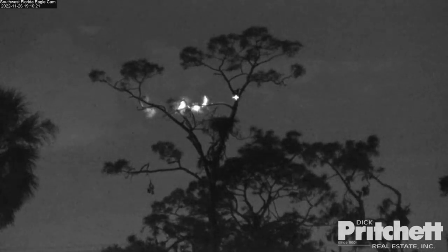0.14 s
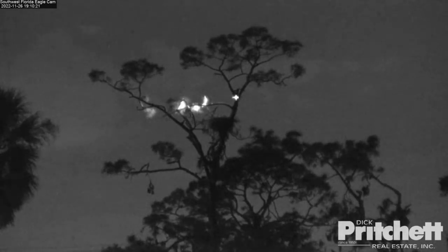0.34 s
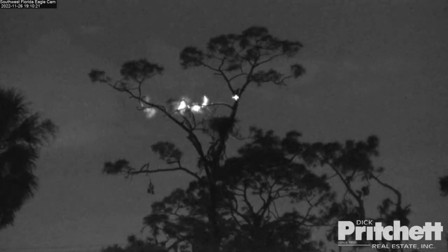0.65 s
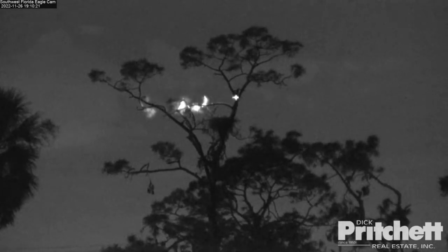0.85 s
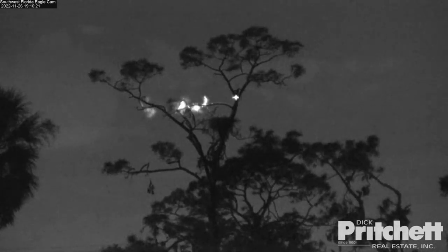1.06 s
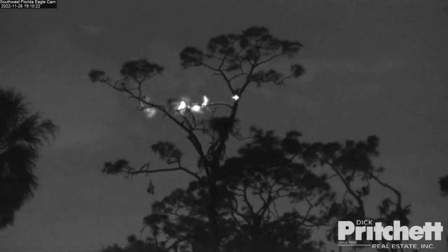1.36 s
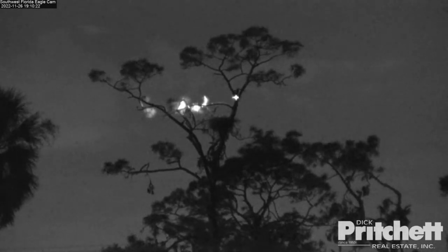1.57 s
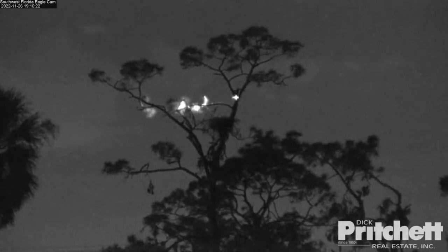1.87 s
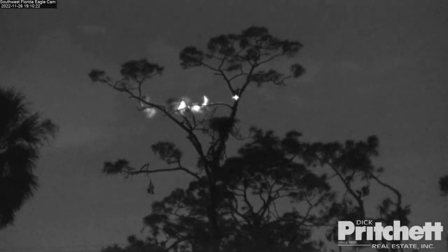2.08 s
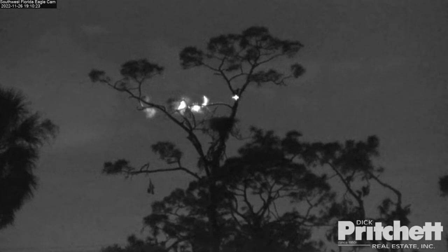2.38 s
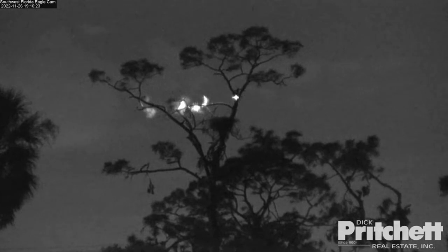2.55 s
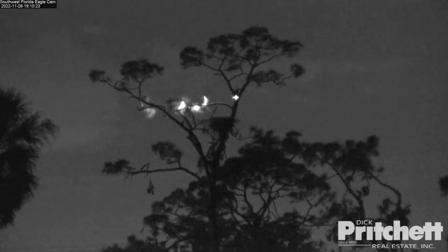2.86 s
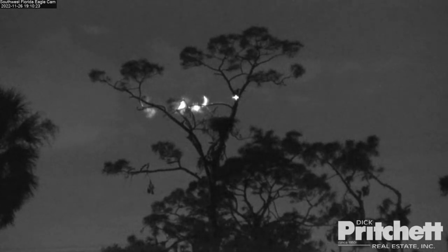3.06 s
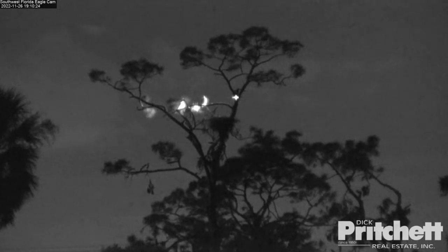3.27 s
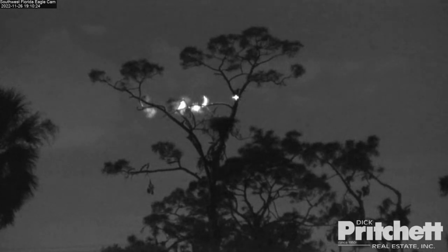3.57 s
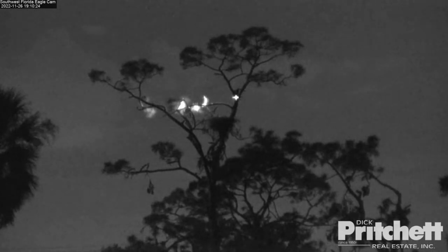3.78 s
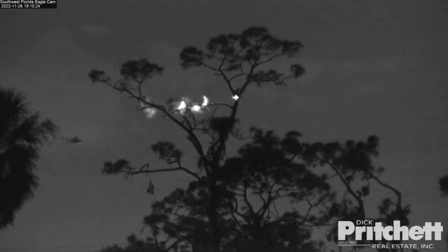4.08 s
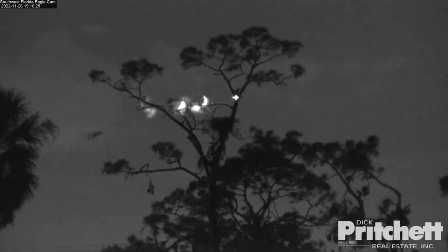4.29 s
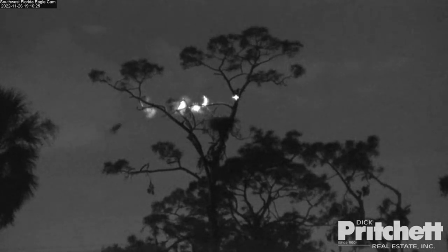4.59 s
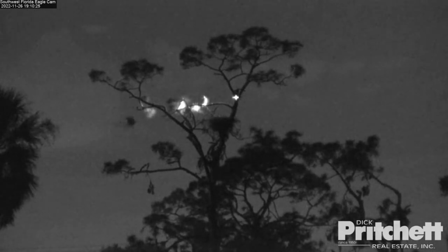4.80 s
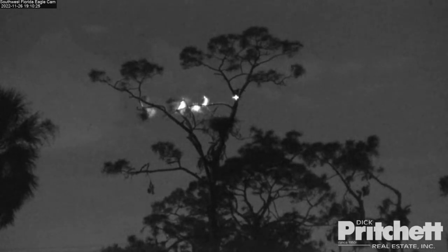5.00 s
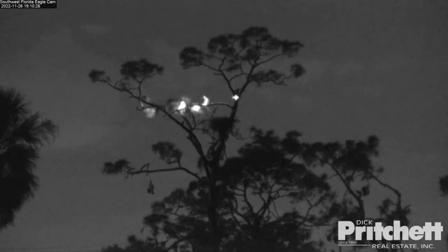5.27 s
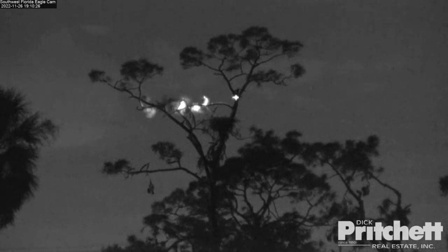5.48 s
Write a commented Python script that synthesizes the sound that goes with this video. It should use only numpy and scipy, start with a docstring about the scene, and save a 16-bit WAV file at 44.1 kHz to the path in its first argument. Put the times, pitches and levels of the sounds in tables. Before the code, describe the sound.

An eagle gives thin, rising squeals and whistles over a low rumble of distant traffic at night.

```python
"""Among pine trees at night, far traffic rumbles under a faint machine hum, insects and a thin hiss.
An eagle calls: air pushed through its voice box (the syrinx) makes thin, rising squeals. Some break
down to a rough low note, others jump up into a whistle. A smaller bird chips faintly in between.
Trunks, ground and foliage throw short echoes back."""
import sys
import numpy as np
from scipy import signal
from scipy.fft import rfft, irfft
from scipy.io import wavfile

SR = 44100
rng = np.random.default_rng(int(sys.argv[2]) if len(sys.argv) > 2 else 0)


def digitize_waveform(pressure):
    """Quantize a signal to 16-bit integers and store it at the path in sys.argv[1].

    Rows of a 2-D input are taken as channels; values are limited to [-1, 1].
    """
    field = np.atleast_2d(pressure).T
    bounded = np.clip(field, -1, 1)
    quanta = np.round(bounded * 32767).astype(np.int16)
    wavfile.write(sys.argv[1], SR, quanta)


N = 248724

# tone colour of the road rumble, the tyre wash and the hiss: f/Hz, relative level/dB
ROAD_RUMBLE = [(4, -9.5), (14, -5), (30, 4.5), (55, -0.5), (70, 6), (90, -3), (115, -8.5), (135, -19),
               (175, -27.5), (240, -35), (400, -85.5)]
TYRE_WASH = [(200, -19.5), (290, -7.5), (350, 1.5), (440, -2.5), (475, -8.5), (660, -9.5), (730, -2),
             (1100, 3.5), (1350, 0.5), (1750, -2), (2100, -15.5), (2700, -22.5), (3300, -33), (5500, -45)]
HISS = [(3000, -20), (5200, -0.5), (6500, -4.5), (7700, 4.5), (8700, -3.5), (9600, -9.5)]
# noisy bands of the machine hum: f/Hz, width/Hz, level/dB
MACHINE_BANDS = [(63, 16, -49), (334.5, 19, -69.5), (714.4, 22, -70), (1505.5, 21, -67), (1698, 160, -63.5)]
# thin tones of the machine hum: f/Hz, level/dB
MACHINE_TONES = [(417, -75), (521, -79)]
# ringing bands of far insects: f/Hz, width/Hz, level/dB
INSECT_BANDS = [(2235, 29, -76.5), (2393, 34, -83), (2666, 62, -83), (2887, 55, -85.5), (3187, 40, -90),
                (3560, 390, -91.5), (4103, 78, -94), (4590, 190, -95), (4810, 70, -97), (5370, 80, -99)]
# the eagle's squeals: t/s, length/s, opening f/Hz, crest f/Hz, sag on the way/Hz, brief slump/Hz,
# final fall/s (0 for none), rough note within that fall/s, relative level/dB, swell in the middle/dB,
# overtones/dB, rasp/0-1, tail/dB, lead-in/s, attack/s, crack/share of the pitch
EAGLE_SQUEALS = [(0.874, 0.082, 1793, 2015, -26, 0, 0.00072, 0.001, -8, 3, 4.5, 0.4, -20.5, 0.027, 0.011, 0.015),
                 (2.036, 0.097, 1864, 2124, -3, -7, 0, 0, -6, 3, 0.5, 0.3, -13, 0.0075, 0.0027, 0.067),
                 (2.504, 0.27, 1927, 2084, 21.5, -2, 0.044, 0.013, -4, -0.5, 1, 0, -26, 0.0096, 0.0088, 0.016),
                 (3.141, 0.33, 1950, 2036, 54.5, 7.5, 0.039, 0.015, -3, -1, 5, 0, -12.5, 0.0046, 0.0017, 0.12),
                 (3.963, 0.22, 1848, 2110, -1.5, -5, 0.044, 0.0056, -5, 0.5, 6, 0, -17, 0.011, 0.0068, 0.016),
                 (4.58, 0.435, 1945, 2083, 78, 45, 0.041, 0.006, -2.5, -1.5, 3.5, 0.03, -15.5, 0.0055, 0.0023, 0.037),
                 (5.458, 0.05, 1893, 2004, -6, 0, 0.00054, 0, -3, -2.5, -1, 0.35, -14, 0.023, 0.0062, 0.0089)]
# its whistles: t/s, length/s, opening f/Hz, closing f/Hz, arch on the way/Hz, relative level/dB,
# overtones/dB, swell towards the end/dB, flutter/0-1, lead-in/s, crack/share of the pitch
EAGLE_WHISTLES = [(0.956, 0.024, 2300, 2370, 3, -13.5, -10.5, -3.5, 0.06, 0.0026, 0.0084),
                  (1.478, 0.12, 2467, 2295, 24, -2.5, -3, 9, 0.78, 0.07, 0.019),
                  (2.126, 0.035, 2344, 2325, 11, 0.5, -4.5, 7, 0, 0.0054, 0.015),
                  (5.512, 0.13, 2380, 2396, 1.5, 4.5, -0.5, 1, 0.03, 0.0043, 0.011)]
# how strongly the eagle's throat passes each frequency: f/Hz, level/dB
EAGLE_THROAT = [(1700, -30), (1820, -35.5), (1900, -36.5), (2030, -38), (2130, -40.5), (2270, -41),
                (2345, -43), (2395, -43.5), (2520, -39.5), (3450, -70), (3650, -65), (3780, -68),
                (3940, -65.5), (4160, -56.5), (4260, -59), (4550, -66.5), (4780, -67), (4950, -70),
                (5300, -82), (5520, -82), (5700, -80), (5970, -75), (6200, -78.5), (6350, -82),
                (7100, -101), (8000, -97), (9600, -101)]
# single echoes off trunks and ground: delay/s, level/dB
TREE_ECHOES = [(.019, -18.5), (.036, -34), (.1, -33.5)]
# the smaller bird's chips: t/s, length/s, f/Hz, level/dB, throat resonance f/Hz, its width/Hz
BIRD_CHIPS = [(3.583, 0.047, 1051, -64, 5240, 120), (3.714, 0.035, 1034, -64.5, 5200, 120),
              (3.833, 0.04, 803, -63, 3810, 250), (4.605, 0.025, 3440, -60, 3400, 3200),
              (4.669, 0.037, 1118, -64.5, 5600, 1490), (4.7, 0.016, 1167, -67, 4630, 400),
              (4.813, 0.032, 1145, -58.5, 5650, 400), (4.805, 0.057, 1183, -73, 4730, 399)]

RELEASE_S = 0.0046  # how quickly the eagle shuts off a note


def gain_of(db):
    """Turns decibels into a factor to multiply by."""
    return 10 ** (np.asarray(db) / 20)


def evened(x):
    """Scales a signal to an average strength (rms) of 1."""
    return x / np.sqrt(np.mean(x ** 2) + 1e-20)


def add(mix, start, sound):
    """Mixes a sound in, start seconds from the beginning."""
    part = mix[round(start * SR):][:len(sound)]
    part += sound[:len(part)]


def fade(t, rise, fall):
    """Soft start and end of a sound."""
    edge = np.clip(np.minimum((t - t[0]) / rise, (t[-1] - t) / fall), 0, 1)
    return np.sin(np.pi / 2 * edge) ** 2


def noise(points):
    """Steady noise, coloured by (f/Hz, level/dB) points."""
    hz, db = np.transpose(points)
    shape_db = np.interp(np.log(np.fft.rfftfreq(N, 1 / SR) + 1), np.log(hz + 1), db)
    return evened(irfft(rfft(rng.standard_normal(N)) * gain_of(shape_db), N))


def band(hz, width_hz):
    """Noise that rings around one pitch; at 0 Hz, a random wobble."""
    offset = (np.fft.rfftfreq(N, 1 / SR) - hz) / width_hz
    return evened(irfft(rfft(rng.standard_normal(N)) / (1 + 2 * offset ** 2), N))


def tremble(t, rate_hz):
    """Smooth random trembling, no faster than about rate_hz."""
    shape = np.exp(-(np.fft.rfftfreq(SR, 1 / SR) / rate_hz) ** 2)
    return evened(irfft(rfft(rng.standard_normal(SR)) * shape, SR))[:len(t)]


def bump(t, width_s):
    """A smooth hill that reaches 1 at t = 0."""
    return np.exp(-(t / width_s) ** 2)


def step(t, blur_s=0.0014):
    """A sudden change from 0 to 1 at t = 0."""
    return .5 + .5 * np.tanh(t / blur_s)


def traffic():
    """A far road: low rumble and a slowly swelling wash of tyres."""
    swell = gain_of(np.linspace(-0.75, 1.5, N))
    return gain_of(-41.5) * noise(ROAD_RUMBLE) + gain_of(-57.5) * noise(TYRE_WASH) * swell


def machine_hum(waver_hz=0.8):
    """A machine drones in bands of noise and thin tones that waver a little."""
    hum = sum(gain_of(db) * band(hz, width_hz) for hz, width_hz, db in MACHINE_BANDS)
    for hz, db in MACHINE_TONES:
        phase = 2 * np.pi * np.cumsum(hz + waver_hz * band(0, 7.3)) / SR
        hum += np.sqrt(2) * gain_of(db) * np.sin(phase)
    return hum


def insects():
    """Far insects blend into a faint, steady ringing."""
    return sum(gain_of(db) * band(hz, width_hz) for hz, width_hz, db in INSECT_BANDS)


def throat(hz):
    """How much of a tone at hz gets through the eagle's throat."""
    return gain_of(np.interp(hz, *np.transpose(sorted(EAGLE_THROAT))))


def breath(age, length, lead, attack, tail, tail_db):
    """The push of air behind a note: a faint lead-in, the full voice, then a weak tail."""
    voiced = np.clip(np.minimum(age / attack, (length - age) / RELEASE_S + .5), 0, 1)
    before = gain_of(-11.5) * np.clip(1 + age / lead, 0, 1) ** .5
    after = gain_of(tail_db) * np.clip(1 - (age - length) / tail, 0, 1) ** .5
    return np.maximum(voiced, np.where(age < length / 2, before, after))


def eagle_voice(age, hz, push, overtones_db, crack, *, jitter, shaky, settle_s, shimmer_db, flicker_db,
                rasp=0, fork=0, end_shake=0, catch_s=0, fork_hz=4140):
    """The syrinx sings a nearly pure tone, shaky at first; returns the base tone and its overtones."""
    unsteady = np.exp(-np.maximum(age, 0) / settle_s) + end_shake * np.exp((age - age[-1]) / 0.12)
    shake = 1 + (jitter + shaky * unsteady) * tremble(age, 79)
    phase = 2 * np.pi * np.cumsum(hz * shake) / SR
    # rasp and an unsteady voice rattle the wave, the overtones most of all
    hoarse = (0.8 * unsteady + rasp) * tremble(age, 150)
    # the pitch shakes in the lead-in and cracks near the start
    cracking = crack * bump(age - catch_s, 0.0028) + 0.012 * (age < 0)
    crack_phase = 2 * np.pi * np.cumsum(hz * cracking * tremble(age, 400)) / SR
    base = throat(hz) * np.sin(phase + 0.18 * rasp * hoarse + crack_phase)
    overtones = sum(throat(k * hz) * np.sin(k * phase + hoarse) for k in range(2, 5))
    # when the voice forks, one side of the syrinx holds a high tone
    fork_phase = 2 * np.pi * np.cumsum(fork_hz * shake) / SR
    high_tone = fork * throat(fork_hz) * np.sin(fork_phase + .25 * hoarse)
    # the tone drops out for an instant near its start, heard as a tiny catch
    dropout = np.tanh((age - catch_s) / 0.0015)
    shimmer = gain_of(shimmer_db * (0.12 + unsteady) * np.tanh(tremble(age, 71)))
    strength = np.sqrt(2) * push * dropout * shimmer * fade(age, 0.0023, 0.0014)
    # the overtones drift slowly, and flicker while the voice is unsteady
    drift_db = overtones_db - tremble(age, 6.7)
    brightness = gain_of(drift_db + flicker_db * unsteady * np.tanh(tremble(age, 99)))
    return strength * base, strength * (overtones * brightness + high_tone)


def squeal(start, length, open_hz, crest_hz, sag_hz, slump_hz, fall, broken_s, db, swell_db,
           overtones_db, rasp, tail_db, lead, attack, crack, broken_hz=1935, slack_hz=1775):
    """The eagle's pitch scoops up, quavers and climbs to a crest, where the voice may break downward."""
    tail = 0.038 if fall > 0 else RELEASE_S
    age = np.arange(-lead, length + tail, 1 / SR)
    voiced = np.maximum(age, 0)
    climb = np.minimum(voiced / (length - fall), 1)
    quaver = -np.cos(2 * np.pi * voiced / 0.033) * np.exp(-voiced / 0.091)
    hz = open_hz + (crest_hz - open_hz) * climb - sag_hz * np.sin(np.pi * climb ** 0.94)
    hz += 27.3 * quaver
    hz -= 84 * bump(voiced, 0.011)  # the scoop starts below the opening pitch
    hz -= slump_hz * bump(age - 0.14, 0.019)
    push = gain_of(db + swell_db * np.sin(np.pi * climb) + 1.5 * quaver)
    push *= breath(age, length, lead, attack, tail, tail_db)
    fork = 0
    if fall > 0:
        since_break = age - length + broken_s
        broken, slack = step(since_break), step(age - length)
        hz -= 45 * np.clip(since_break / (fall - broken_s) + 1, 0, 1) ** 2.24  # eases off the crest
        # it drops to a rough note, then trails off lower and reedier as the syrinx goes slack
        hz += (broken_hz - hz) * broken + (slack_hz - broken_hz) * slack
        rasp += 0.35 * broken
        overtones_db += 4.5 * slack
        push *= gain_of(3 * (broken - slack))  # a last push of air
        push *= 1 - 0.2 * bump(since_break, 0.0025)  # the tone thins as it breaks
        fork = broken * gain_of(-5.5) * bump(np.maximum(age - length, 0), 0.022)
    base, overtones = eagle_voice(age, hz, push, overtones_db, crack, jitter=0.00079, shaky=0.013,
                                  settle_s=0.068, shimmer_db=4.5, flicker_db=3,
                                  rasp=rasp, fork=fork, end_shake=0.27, catch_s=0.009)
    return start - lead, base, overtones


def whistle(start, length, open_hz, close_hz, arch_hz, db, overtones_db, swell_db, flutter, lead, crack,
            flutter_s=0.0336):
    """The eagle's higher voice: a smooth, arched glide that swells or fades; its level may dip in regular
    beats."""
    tail = 0.021
    age = np.arange(-lead, length + tail, 1 / SR)
    glide = np.clip(age / length, 0, 1)
    hz = open_hz + (close_hz - open_hz) * glide + arch_hz * np.sin(np.pi * glide)
    dips = 1 - flutter * np.sin(np.pi * age / flutter_s) ** 10
    push = gain_of(db + swell_db * glide) * dips
    push *= breath(age, length, lead, attack=0.0054, tail=tail, tail_db=-19.5)
    base, overtones = eagle_voice(age, hz, push, overtones_db, crack, jitter=0.00096, shaky=0.012,
                                  settle_s=0.036, shimmer_db=0.5, flicker_db=-4)
    return start - lead, base, overtones


def eagle():
    """All the squeals and whistles, with base tones and overtones kept apart."""
    notes = [squeal(*row) for row in EAGLE_SQUEALS] + [whistle(*row) for row in EAGLE_WHISTLES]
    base, overtones = np.zeros((2, N))
    for start, low, high in notes:
        add(base, start, low)
        add(overtones, start, high)
    return base, overtones


def trees(sound, trunk_db, scatter_db, decay_s=0.12, trunk_s=0.00839):
    """Adds echoes: one off the nearest trunk, a few later ones and a faint scatter from the foliage."""
    t = np.arange(SR // 2) / SR
    scatter = rng.standard_normal(len(t)) * gain_of(-60 * t / decay_s) * (t > .006)
    echoes = gain_of(scatter_db) * scatter / np.linalg.norm(scatter)
    for delay, db in [(trunk_s, trunk_db)] + TREE_ECHOES:
        add(echoes, delay, gain_of([db]))
    return sound + signal.oaconvolve(sound, echoes)[:N]


def small_bird(arch=0.011, rasp=0.013):
    """Short chips that arch in pitch; the throat picks out one or two harmonics."""
    chips = np.zeros(N)
    for start, length, hz, db, throat_hz, width_hz in BIRD_CHIPS:
        t = np.arange(0, length, 1 / SR)
        bend = 1 - arch * (2 * t / length - 1.25) ** 2
        roughness = rasp * min(width_hz / 400, 1) * band(0, 180)[:len(t)]
        phase = 2 * np.pi * np.cumsum(hz * (bend + roughness)) / SR
        tone = sum(np.sin(k * phase) / (1 + (2 * (k * hz - throat_hz) / width_hz) ** 2)
                   for k in range(1, 7))
        add(chips, start, gain_of(db) * evened(tone * fade(t, 0.0026, 0.0031)))
    return chips


def scene():
    """Both birds among the trees, over the steady sounds of the night."""
    base, overtones = eagle()
    calls = trees(base, trunk_db=-24, scatter_db=-28)
    # the beak beams the overtones aside, so more of them arrives as echo
    calls += trees(overtones, trunk_db=-5, scatter_db=-14, decay_s=0.13)
    chips = trees(small_bird(), trunk_db=-15, scatter_db=-26)
    night = traffic() + machine_hum() + insects() + gain_of(-92.5) * noise(HISS)
    return (night + calls + chips)[None]


def record(dry, top_hz=9650):
    """Softens the very start and end, and cuts the highest treble."""
    faded = dry * fade(np.arange(N) / SR, 0.00057, 0.0017)
    low_pass = signal.firwin(511, top_hz, window=("kaiser", 9), fs=SR)
    return signal.oaconvolve(faded, low_pass[None], "same")


dry = scene()
out = record(dry)
digitize_waveform(out)
```